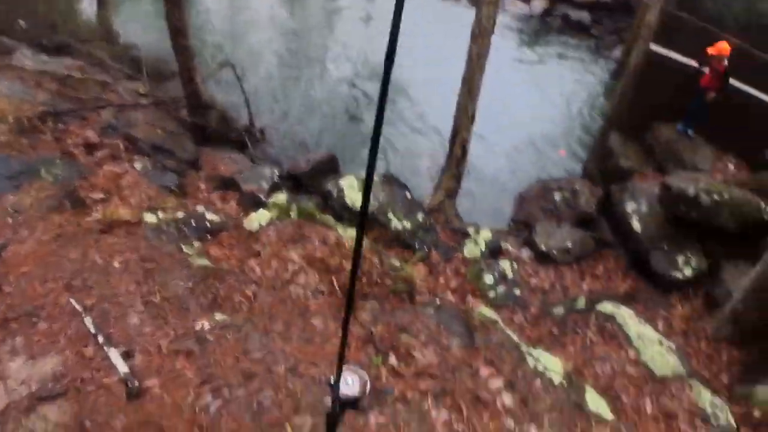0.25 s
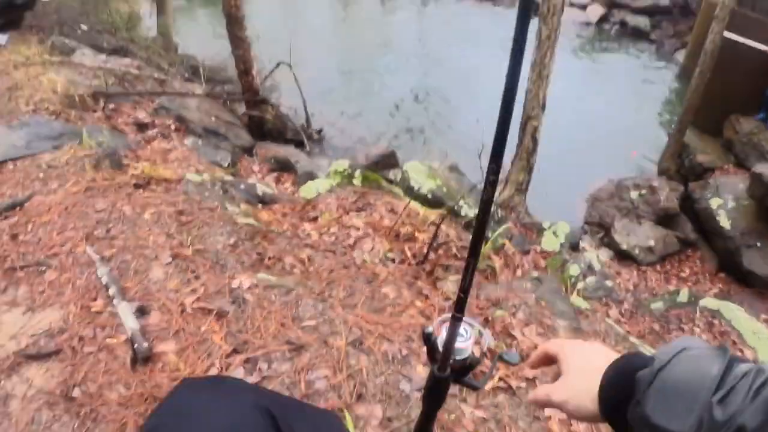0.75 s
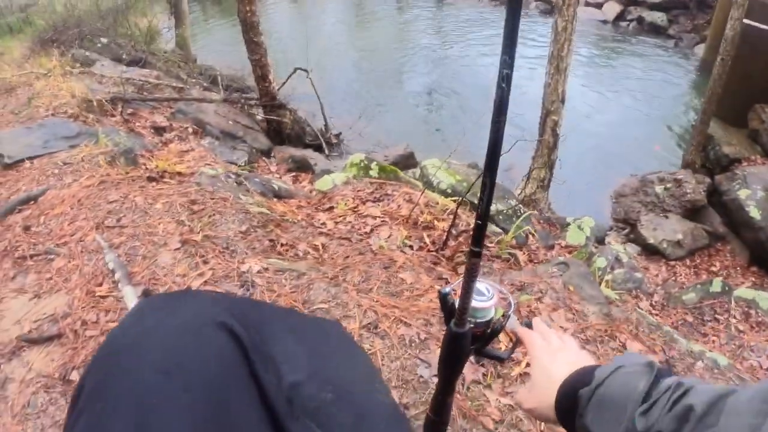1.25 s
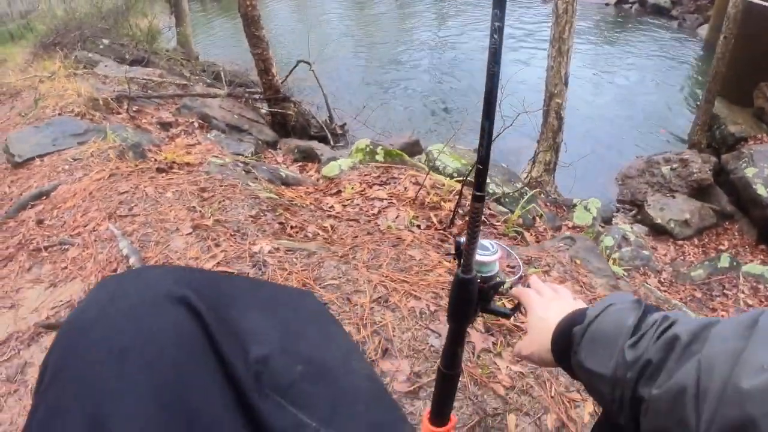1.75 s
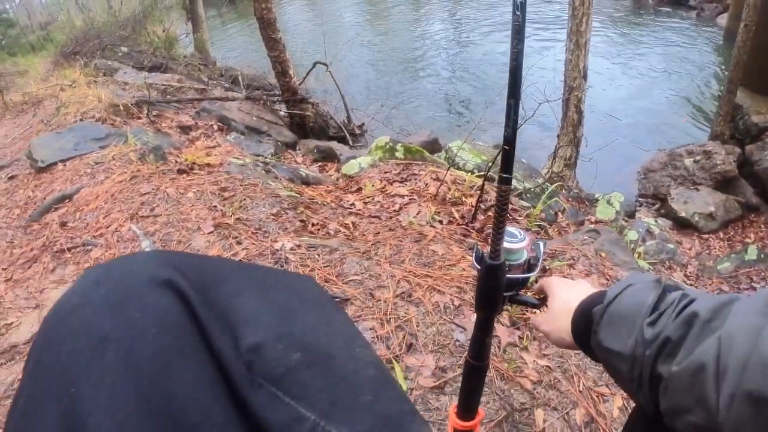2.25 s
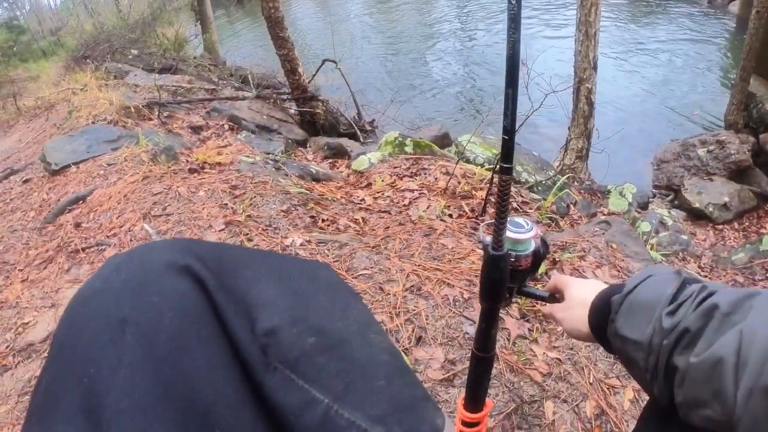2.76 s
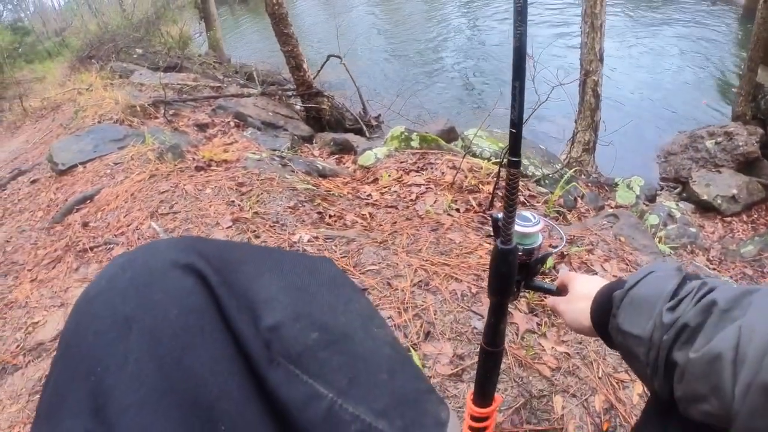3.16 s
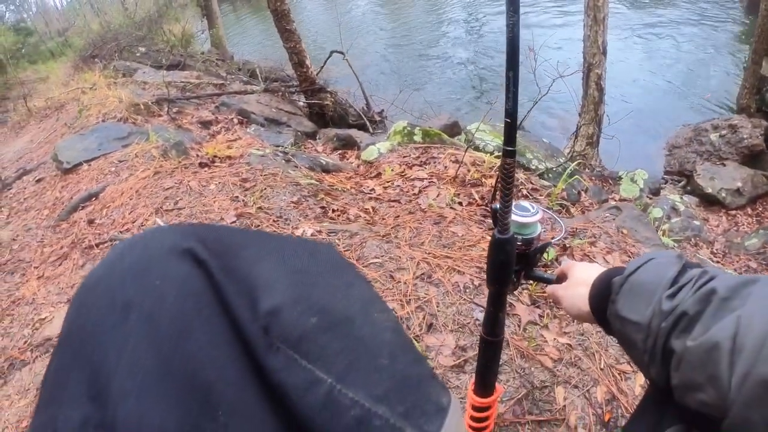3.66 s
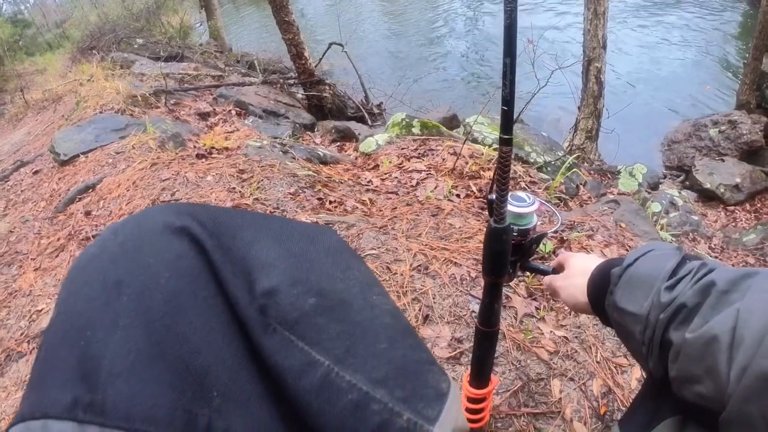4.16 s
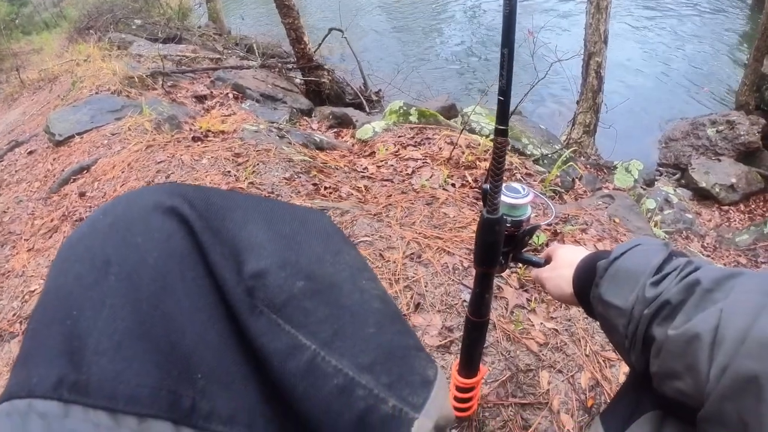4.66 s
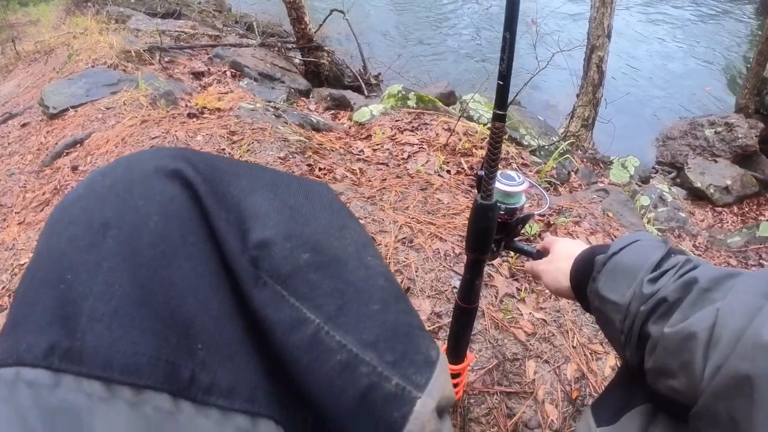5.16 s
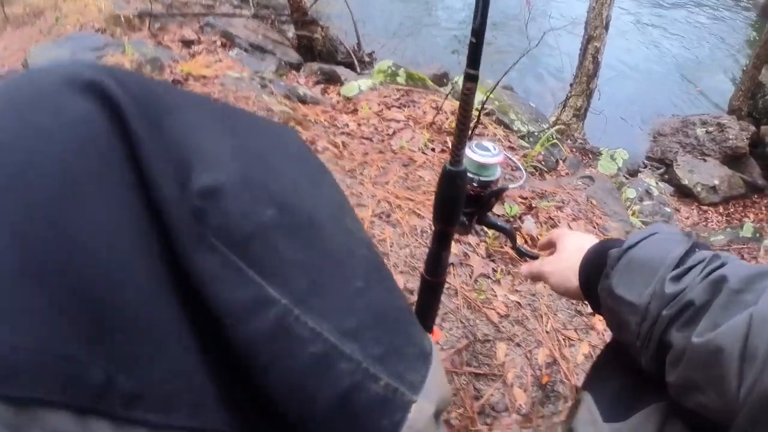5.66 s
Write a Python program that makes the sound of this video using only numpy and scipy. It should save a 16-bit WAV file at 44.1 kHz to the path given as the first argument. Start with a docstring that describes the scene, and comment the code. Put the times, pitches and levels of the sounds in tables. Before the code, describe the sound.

Jacket cloth swishes and knocks against a body-worn camera case, settles into soft rubbing with ticks and clicks, then judders heavily; faint muffled water behind.

```python
"""Cloth rubs, swishes and finally judders in sticks and slips over a closed plastic case with two ports,
worn on the chest of an angler who crouches by a creek. Friction noise drives the case's modes.
Rod and gear knock on it as short pushes into the same modes; arm and chest bump it as damped swings.
The tackle ticks as coloured noise bursts, the reel clicks as short damped sines.
Behind it all a spillway rushes, dull through the case: steady filtered noise."""
import sys
import numpy as np
from scipy import signal
from scipy.fft import rfft, irfft, next_fast_len
from scipy.io import wavfile

SR = 44100
rng = np.random.default_rng(int(sys.argv[2]) if len(sys.argv) > 2 else 0)


def output_pcm(signal):
    """Save a mono or channel-first signal as 16-bit PCM at the path in sys.argv[1].

    Samples are clipped to [-1, 1] before scaling.
    """
    pcm = np.clip(np.atleast_2d(signal).T, -1, 1) * 32767
    wavfile.write(sys.argv[1], SR, np.round(pcm).astype(np.int16))


N = 260190
TIME = np.arange(N) / SR
CUTOFF_HZ = 15900
# where the cloth bears on the case: (t/s, left minus right level/dB, before each layer's own offset)
RUB_SIDE = [(0, 14.5), (0.25, -18.5), (0.45, 1.5), (1.05, 0.5), (1.3, -9.5), (2.5, -5), (3.2, -5.5),
            (5.5, -9), (5.68, 1)]
# sticking begins here: the steady rub is soon held down, and stays so, while slips stand out
STICK_FROM_S, STICK_DB_PER_S, STICK_MOST_DB = 5.41, 50, 8.5
# a fainter, brighter noise burst: decay time constant and upper edge
SNAP_S, SNAP_HZ = 0.012, 5090


def from_db(db):
    """Logarithmic level to amplitude: 20 dB is a factor of ten."""
    return 10 ** (np.asarray(db) / 20)


def mid_one(x):
    """Power normalization: the mean of the two ports gets rms 1."""
    middle = x.mean(axis=0)
    return x / np.sqrt(np.mean(middle ** 2) + 1e-20)


def peak_one(x):
    """Peak normalization: the mean of the two ports peaks at 1."""
    return x / np.abs(x.mean(axis=0)).max()


def in_time(rows):
    """Linear interpolation: the columns of a curve at every sample."""
    s, *columns = np.transpose(rows)
    return [np.interp(TIME, s, column) for column in columns]


def panned(side_db):
    """Level difference between the ports: left and right gains, split evenly in dB."""
    return from_db(np.array([[.5], [-.5]]) * side_db)


def side_at(s):
    """Source position: left minus right dB of the cloth's contact at time s."""
    return np.interp(s, *np.transpose(RUB_SIDE))


def drift(rate_hz):
    """Low-passed random process: slow chance of spread 1, with two equal poles at rate_hz."""
    step = 40  # samples between slow values
    pole = np.exp(-2 * np.pi * rate_hz * step / SR)
    white = rng.standard_normal(N // step + 2002)
    slow = signal.lfilter([1], [1, -2 * pole, pole * pole], white)[2000:]
    return np.interp(np.arange(N) / step, np.arange(len(slow)), slow / slow.std())


def coloured(x, spectrum):
    """Linear filtering: weight a sound by a smooth curve over log frequency, falling off below it."""
    size = next_fast_len(x.shape[-1])
    hz, db = np.transpose(spectrum)
    bins = np.maximum(np.fft.rfftfreq(size, 1 / SR), 1)
    gain = from_db(np.interp(np.log(bins), np.log(hz), db))
    gain = gain * np.minimum(bins / hz[0], 1) ** 2
    return irfft(rfft(x, size) * gain, size)[..., :x.shape[-1]]


def low_passed(x, hz, order):
    """Contact stiffness: a soft contact passes little above hz."""
    corner = np.clip(hz, 50, .45 * SR)
    return signal.sosfilt(signal.butter(order, corner, fs=SR, output="sos"), x)


def stereo_noise(alike):
    """Partial coherence: white noise of which the share alike (of power) is common to both ports."""
    shared, own = rng.standard_normal(N), rng.standard_normal((2, N))
    alike = np.clip(alike, 0, 1)
    return np.sqrt(alike) * shared + np.sqrt(1 - alike) * own


def friction(alike, grain_db, grain_rate_hz):
    """Dry friction: the force of many threads catching and letting go is noise of clumpy level."""
    return stereo_noise(alike) * from_db(grain_db * drift(grain_rate_hz))


def add(out, s, sound):
    """Superposition: mix a short stereo sound in at time s."""
    start = max(round(s * SR), 0)
    out[:, start:start + sound.shape[1]] += sound[:, :max(N - start, 0)]


def case_ring(thud_db, crack_db, press_db, choke=0):
    """Modal impulse response: thud, press and crack weight the low, flat-wall and high modes."""
    # modes of the case: (f/Hz, undisturbed decay by 60 dB/s, relative level left/dB, right/dB)
    case = [(115, .05, -21, -16), (185, .05, -15, -20), (240, .06, -16, -21), (303, .085, -18, -9),
            (338, .07, -13, -10), (475, .04, -17, -26), (600, .05, -16, -24), (692, .07, -9, -11),
            (778, .1, -19, 0), (850, .07, -22, -10), (905, .05, -18, -19), (1030, .03, -14, -20),
            (1415, .04, -18, -4), (1490, .035, -14, -5), (1755, .035, -5, -20), (1870, .035, -14, -24),
            (1975, .035, -13, -22), (2140, .03, -19, -24), (2262, .055, -13, -16), (2450, .03, -23, -15),
            (2615, .025, -25, -25), (3780, .025, -28, -21)]
    hz, t60, left_db, right_db = np.transpose(case)
    t = TIME[:SR // 5]
    low, wall, high = hz < 560, (hz > 650) & (hz < 735), hz > 950
    weight_db = thud_db * low + press_db * wall + crack_db * high
    # neighbouring modes start in opposite directions, so the ring swells over a few cycles
    signs = (-1) ** np.arange(len(hz))
    # slow bending waves reach the left port later
    lag_s = 0.00065 * (hz < 820)
    # choke is in dB per ms on the high modes; the others feel a quarter, negative values count as none
    choke_share = np.where(high, 1, 0.25)[:, None]
    choked = from_db(-max(choke, 0) * choke_share * 1000 * t)
    ports = []
    for port_db, age in ((left_db, np.maximum(t - lag_s[:, None], 0)), (right_db, t)):
        decay = np.exp(-np.log(1000) * age / t60[:, None])
        modes = np.sin(2 * np.pi * hz[:, None] * age) * decay
        ports.append(signs * from_db(port_db + weight_db) @ (modes * choked))
    return signal.sosfilt(signal.butter(2, 80, "high", fs=SR, output="sos"), ports)


def contact(grit, grit_s):
    """Impulsive excitation: one push of height 1 amid a decaying noise scuff."""
    t = TIME[:SR // 20]
    force = grit * rng.standard_normal((2, len(t))) * np.exp(-t / grit_s)
    force[:, 0] += 1
    return force


def clack(decay_s, edge_hz):
    """High modal density: the many tightly damped modes of a contact blur into a noise burst."""
    t = TIME[:SR // 5]
    noise = rng.standard_normal(len(t)) + .5 * rng.standard_normal((2, len(t)))
    burst = low_passed(noise * np.exp(-t / decay_s), edge_hz, order=8)
    return signal.sosfilt(signal.butter(2, 150, "high", fs=SR, output="sos"), burst)


def sliding():
    """Kinematics of the cloth: speed (as swish level) and pressure in two sweeps, then a long drag."""
    # quickening sweeps: (start t/s, stop t/s, final swish level/dB, final pressure level/dB)
    strokes = [(0.0, 0.435, -52.5, -1), (0.526, 0.878, -55.5, 11)]
    # sliding speed while the hand works at the reel: (t/s, swish level/dB)
    drag = [(0.98, -75), (1.13, -59.5), (1.2, -55.5), (1.23, -58.5), (1.3, -57.5), (1.38, -51),
            (1.46, -57.5), (1.55, -58), (1.77, -61), (2.14, -59), (2.22, -62), (3.29, -65), (3.38, -63),
            (4.78, -65), (4.94, -75.5), (5.13, -65), (5.87, -59.5)]
    # how hard the cloth bears on the case during the drag: (t/s, pressure level/dB)
    bearing = [(0.98, 0), (1.15, -2), (1.38, -1.5), (1.55, 1.2), (2.2, 1.2), (2.85, 2), (3.05, 0.5),
               (3.9, 1.5), (4.9, -1), (5.24, 3), (5.42, 8), (5.57, 12), (5.62, 9.5), (5.7, 13.5),
               (5.89, 10)]
    rest_db, rest_pressure_db = -77.5, -0.5  # the cloth all but rests
    swish_db = np.interp(TIME, *np.transpose(drag), left=rest_db)
    pressure_db = np.interp(TIME, *np.transpose(bearing), left=rest_pressure_db)
    for start, stop, top_db, lean_db in strokes:
        progress = np.clip((TIME - start) / (stop - start), 0, 1)
        moving = np.clip(1 - (TIME - stop) / 0.02, 0, 1)  # an abrupt end
        # speed comes early in a sweep, pressure late
        swish_db = swish_db + (top_db - rest_db) * (1 - (1 - progress) ** 1.63) * moving
        pressure_db = pressure_db + (lean_db - rest_pressure_db) * progress ** 4 * moving
    return swish_db, pressure_db


def friction_levels():
    """Friction power laws: rumble and shell ringing grow with speed, the ringing most with pressure."""
    swish_db, pressure_db = sliding()
    speed_db = swish_db + 63.5  # relative to the usual sliding speed
    stuck_db = np.clip((TIME - STICK_FROM_S) * STICK_DB_PER_S, 0, STICK_MOST_DB)
    rumble_db = -43 + 0.71 * speed_db + 1 * pressure_db - 0.5 * stuck_db
    bite_db = -56.5 + 1 * speed_db + 2.82 * pressure_db - stuck_db
    return rumble_db, bite_db


def rubbing():
    """Forced vibration: sliding cloth shakes the whole case and sets its shell ringing."""
    # spectra of the shaking, of the rocking and of the biting force: (f/Hz, relative level/dB)
    rumble_colour = [(30, -15), (50, -12.5), (95, -1.5), (160, -0.5), (230, -6.5), (310, -5.5),
                     (430, -18.5), (650, -15.5), (900, -18), (1150, -42), (2200, -39), (3200, -64)]
    boom_colour = [(38, 0.5), (62, 3), (100, 3.5), (160, -23), (400, -40.5), (1000, -88)]
    bite_colour = [(100, -34.5), (300, -10), (500, -5), (700, -8), (880, -4.5), (1150, -12), (1480, -4.5),
                   (1900, -19.5), (2600, -8), (4000, -28)]
    # how freely the whole case rocks: (t/s, level/dB relative to the rumble)
    rocking = [(0.98, -19), (1.6, -6.5), (5.2, -3.5), (5.4, 4), (5.55, 4.5), (5.65, -5.5)]
    rumble_db, bite_db = friction_levels()
    side_db, = in_time(RUB_SIDE)
    rumble = coloured(friction(alike=0.11, grain_db=1.82, grain_rate_hz=24), rumble_colour)
    # a hard bite presses on the flat wall and chokes the high modes
    force = coloured(friction(alike=1.0, grain_db=3.5, grain_rate_hz=13), bite_colour)
    light_ring = case_ring(thud_db=8.5, crack_db=-10.0, press_db=6.0)
    pressed_ring = case_ring(thud_db=9.5, crack_db=-21, press_db=14.0)
    light = signal.fftconvolve(force, light_ring, axes=1)[:, :N]
    pressed = signal.fftconvolve(force, pressed_ring, axes=1)[:, :N]
    pressed_share = np.clip((bite_db + 46.5) / 10, 0, 1)
    shell = (1 - pressed_share) * mid_one(light) + pressed_share * mid_one(pressed)
    # the whole case rocks when the rub gets heavy, growing faster than the rumble up to -20 dB
    rocking_db, = in_time(rocking)
    boom_db = rumble_db + 0.26 * np.minimum(rumble_db + 20.0, 0) + rocking_db
    boom = coloured(stereo_noise(alike=1.0), boom_colour)
    return (from_db(rumble_db - 0.92) * mid_one(rumble * panned(side_db))
            + from_db(boom_db) * mid_one(boom * panned(side_db - 35.0))
            + from_db(bite_db - 6.0) * shell * panned(side_db - 7.0))


def jacket():
    """Broadband friction noise: the weave hisses along, and uneven folds shift its colour."""
    # spectrum of the hiss: (f/Hz, relative level/dB)
    swish_colour = [(900, 4), (1500, 3), (2300, -6), (3000, -7.5), (4200, -11.5), (5800, -21.5),
                    (7400, -17), (8800, -8), (12500, -0.5), (15800, -5)]
    swish_db, _ = sliding()
    hiss = 0
    for band in ((400, 7000), (7000, 11500), (11500, 18000)):
        threads = friction(alike=0.42, grain_db=1.5, grain_rate_hz=32)
        threads = signal.sosfilt(signal.butter(2, band, "band", fs=SR, output="sos"), threads)
        hiss = hiss + threads * from_db(1.3 * drift(rate_hz=13))  # each band flutters alone
    return from_db(swish_db + 1.5) * mid_one(coloured(hiss, swish_colour) * panned(side_db=-1.5))


def judder():
    """Stick-slip: each slip is a soft push on the damped shell, a dull 'tuk' with a short scrape."""
    # the pressed cloth breaks loose: (t/s, level/dB)
    slips = [(5.407, -25.5), (5.426, -17), (5.445, -19.5), (5.470, -18), (5.500, -17.5), (5.516, -19),
             (5.536, -20.5), (5.551, -18), (5.577, -15), (5.651, -14), (5.6723, -20), (5.6955, -15.5),
             (5.7298, -14), (5.7536, -18), (5.774, -22.5), (5.8071, -15.5), (5.829, -20), (5.853, -14),
             (5.889, -13)]
    out, t = np.zeros((2, N)), TIME[:SR // 5]
    # the pressing cloth soaks up the ring within milliseconds
    damped_ring = case_ring(thud_db=9.0, crack_db=-20.0, press_db=10) * np.exp(-t / 0.0062)
    bright_ring = case_ring(thud_db=-7, crack_db=12, press_db=0)
    for s, db in slips:
        push = signal.fftconvolve(contact(grit=.015, grit_s=.004), damped_ring, axes=1)
        push = low_passed(push, 904, order=8) * panned(side_at(s) - 1)
        add(out, s, from_db(db) * peak_one(push))
        weave = rng.standard_normal((2, len(t))) * np.exp(-t / 0.022)
        scrape = signal.fftconvolve(weave, bright_ring, axes=1)[:, :len(t)]
        scrape = peak_one(low_passed(scrape, 2250, order=4) * panned(side_at(s) + 12))
        # it scrapes more as the cloth tightens (19 dB per s), with a faint hiss on top
        scrape_db = db - 35 + 19 * (s - STICK_FROM_S)
        hiss = from_db(-21) * clack(SNAP_S, SNAP_HZ)
        add(out, s, from_db(scrape_db) * (scrape + hiss))
    return out


def knocks():
    """Impact excitation: a blow clacks and rings the case; gear resting on it chokes the ring."""
    # gear on the case: (t/s, relative level/dB, thud level/dB, flat wall level/dB, crack level/dB,
    # left minus right level/dB, choking of the high modes/(dB per ms))
    blows = [(0.4215, -17.5, -4, -13, 0.5, 0, 2.5), (0.4297, -15, 7.5, -1.5, 2, -3, -0.5),
             (0.4615, -22, -1.5, -15, -15, 6, 0.3), (0.8275, -23.5, 6, -6, -25, -10, 1),
             (0.8694, -18.5, -5, -11, 3, -1.5, 2), (0.8762, -13.5, 2.5, 9, -0.5, 4.5, 1.4),
             (0.8852, -18, 4.5, 7, -0.5, 2, 0.5), (1.357, -33, 3, -2, -21, -15.5, 1.5),
             (1.817, -37.5, -14, -10, -30, -8, 1.5), (1.873, -32.5, -2, 3, -5, -15, 2.5),
             (1.959, -38.5, -12, -12, -26, -12, -2), (2.043, -36.5, -14, -16, -26, -14, 2.5),
             (2.1125, -28.5, 0, -3, -17, -2, 2.5), (2.1403, -37, 8, -10, -15, -6, -3),
             (2.1753, -40.5, 14.5, -12, -5.5, -13.5, 0.5), (2.184, -29, 3.5, -10, -30, -6.5, -2),
             (2.239, -32, -30, -12, -30, -4.5, -2.5), (2.553, -35, -22, -4, -41, -9, -3),
             (2.774, -39, -12, -10, -25, -13, 7), (2.8118, -20, -14.5, -9, -12, -10.5, 0.3),
             (3.124, -44, -4, -10, -25, -8, 10), (3.751, -44, -15, -10, -20, -8, -1),
             (3.928, -40, 11.5, -10, -11, -8, 1), (5.278, -40, -9, 11, -30, -15, 1),
             (5.300, -33, -4, 3, -23, -9, 3.5)]
    out = np.zeros((2, N))
    for s, db, thud_db, wall_db, crack_db, side_db, choke in blows:
        force = low_passed(contact(grit=0.018, grit_s=0.005), 2710, order=4)
        modes = case_ring(thud_db, crack_db - 0.5, wall_db, choke)
        ring = signal.fftconvolve(force, modes, axes=1)[:, :modes.shape[1]]
        # a hard burst and its brighter edge
        burst = from_db(-6) * clack(decay_s=0.0022, edge_hz=2300) + from_db(-38) * clack(SNAP_S, SNAP_HZ)
        add(out, s, from_db(db + 4.0) * panned(side_db) * (ring + from_db(crack_db) * burst))
    return out


def bumps():
    """Dipole motion: a shove swings the case, pressing air into one port and drawing it from the other."""
    # arm and chest against the case: (t/s, level/dB, f/Hz, left minus right level/dB)
    shoves = [(0.827, -15, 230, -8), (0.877, -21, 150, -9), (0.884, -17, 190, 6), (0.982, -37.5, 156, 7),
              (2.172, -28.5, 130, -19), (5.328, -30, 110, -7.5), (5.377, -20, 130, -15),
              (5.613, -22, 148, -13)]
    out, t = np.zeros((2, N)), TIME[:SR // 10]
    for s, db, hz, side_db in shoves:
        rise = hz * t / 0.6  # the envelope peaks after 0.6 cycles
        swing = np.sin(2 * np.pi * hz * t) * rise * np.exp(1 - rise)
        add(out, s, from_db(db) * panned(side_db) * [[1], [-1]] * swing)
    return out


def tackle():
    """Short-pulse radiation: tiny noise bursts with a bright spectral peak and some body below it."""
    # small sharp ticks: (t/s, level/dB, f/Hz of the peak, relative body level/dB)
    ticks = [(0.099, -46, 12500, -34), (1.658, -35, 14100, -30), (2.0194, -39, 12500, -26),
             (2.8115, -38.5, 13800, -3), (3.4722, -45, 12400, -22), (4.0643, -49, 11300, -19),
             (4.3377, -49, 13200, -27), (4.688, -47, 12600, -32), (5.09, -48, 11600, -26)]
    # the bright peak: (multiple of the tick's f, relative level/dB)
    tick_peak = [(0.45, -28), (0.7, -16.5), (1, 1.5), (1.3, -9)]
    # spectrum of the body: (f/Hz, relative level/dB)
    tick_body = [(1500, -8), (3800, 4), (6000, -5), (10000, -8), (16000, -12)]
    out, t = np.zeros((2, N)), TIME[:SR // 50]
    lead = SR // 1000  # samples of room ahead of the burst for the filter
    for s, db, hz, body_db in ticks:
        burst = np.pad(rng.standard_normal(len(t)) * np.exp(-t / 0.0021), (lead, 0))
        peak = [(multiple * hz, level_db) for multiple, level_db in tick_peak]
        tick = coloured(burst, peak) + from_db(body_db) * coloured(burst, tick_body)
        tick = low_passed(tick, CUTOFF_HZ, order=8)
        add(out, s - lead / SR, from_db(db) * peak_one(panned(side_db=-9) * tick))
    return out


def reel():
    """Damped oscillation: small reel parts touch under the fingers, each with a short ring of its own."""
    # soft clicks: (t/s, level/dB, f/Hz)
    clicks = [(2.02, -53, 1500), (2.107, -54, 2560), (2.186, -52, 2500), (2.95, -49, 1360),
              (2.971, -53.5, 2180), (3.1437, -45, 1620), (3.39, -67, 4700), (3.468, -67, 4900),
              (3.634, -46, 1040), (4.228, -60.5, 4430)]
    out, t = np.zeros((2, N)), TIME[:SR // 20]
    for s, db, hz in clicks:
        ring = np.sin(2 * np.pi * hz * t) * np.exp(-t / 0.0014)
        click = signal.fftconvolve(contact(grit=0.13, grit_s=0.014), ring[None], axes=1)
        add(out, s, from_db(db) * panned(side_db=-6) * peak_one(click))
    return out


def spillway():
    """Incoherent summation: countless far bubbles merge into an even rush, muffled by the case."""
    # spectrum of the water through the case: (f/Hz, relative level/dB)
    water_colour = [(40, -8), (100, -7.5), (300, 2), (500, -3.5), (780, -15), (1200, -5.5), (2500, -25),
                    (5500, -31.5), (9000, -33.5), (13000, -34), (16000, -50)]
    return from_db(-67.5) * mid_one(coloured(stereo_noise(alike=0.55), water_colour))


def scene():
    """Superposition: handling noise right on the case, water behind."""
    handling = rubbing() + jacket() + judder() + knocks() + bumps()
    return handling + tackle() + reel() + spillway()


def record(dry):
    """Band limitation: the deepest bass is lost, the top is cut steeply."""
    x = signal.sosfilt(signal.butter(2, 42, "high", fs=SR, output="sos"), dry)
    return signal.sosfilt(signal.ellip(12, .1, 80, CUTOFF_HZ, fs=SR, output="sos"), x)


dry = scene()
out = record(dry)
output_pcm(out)
```